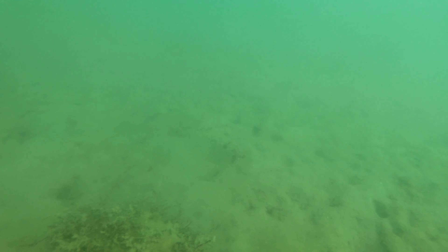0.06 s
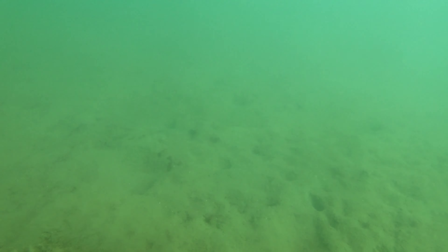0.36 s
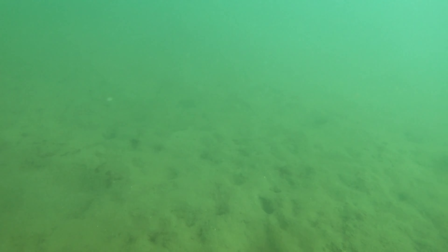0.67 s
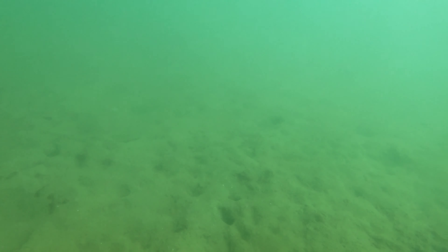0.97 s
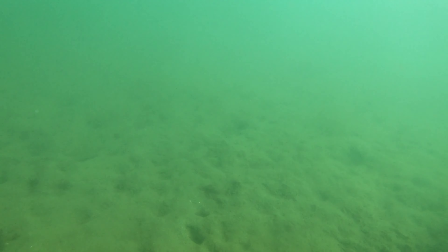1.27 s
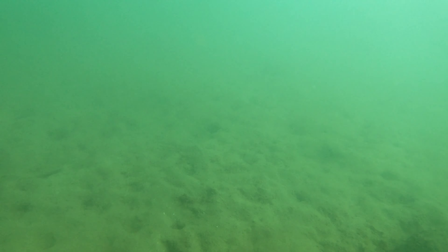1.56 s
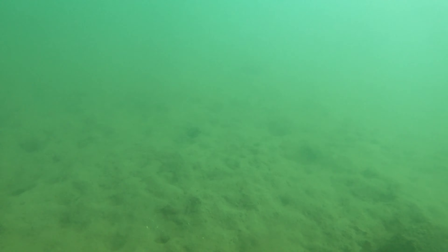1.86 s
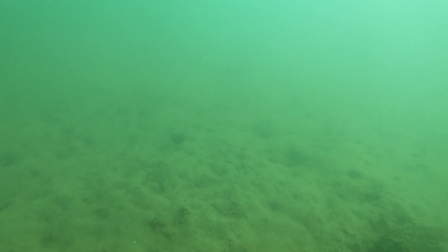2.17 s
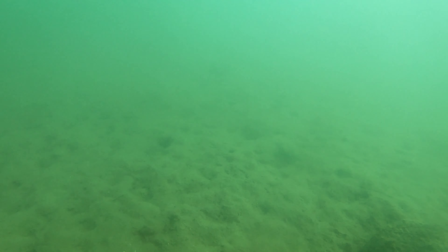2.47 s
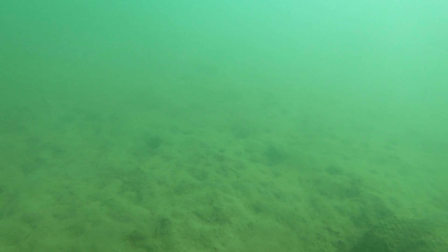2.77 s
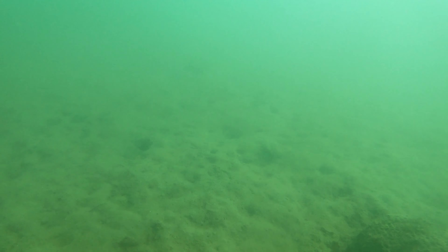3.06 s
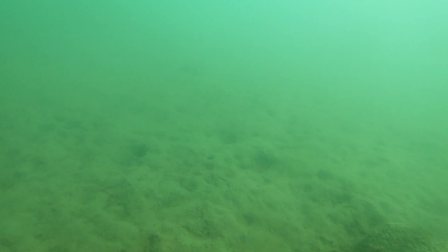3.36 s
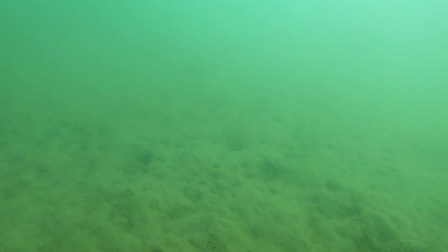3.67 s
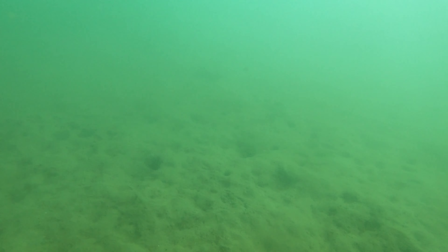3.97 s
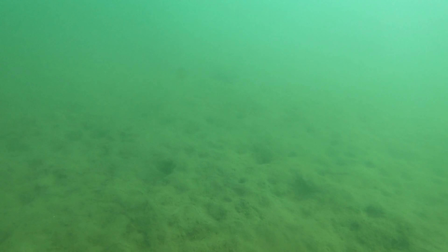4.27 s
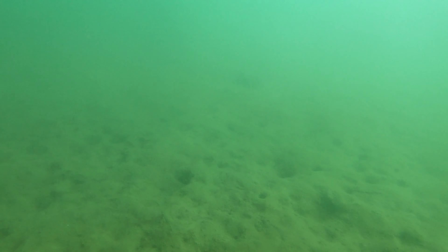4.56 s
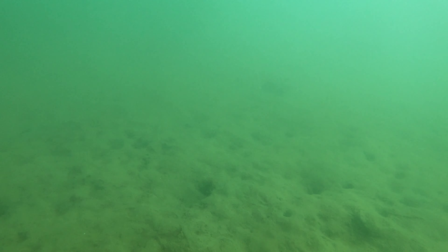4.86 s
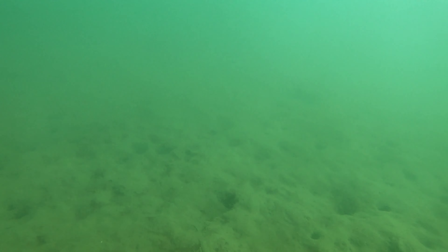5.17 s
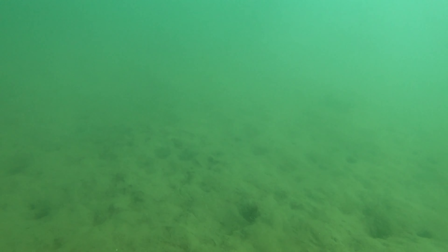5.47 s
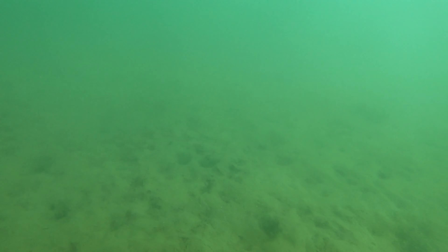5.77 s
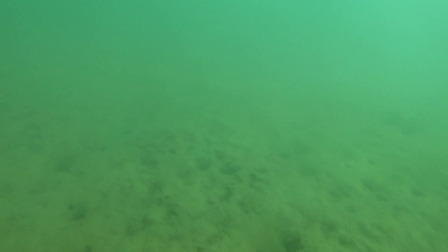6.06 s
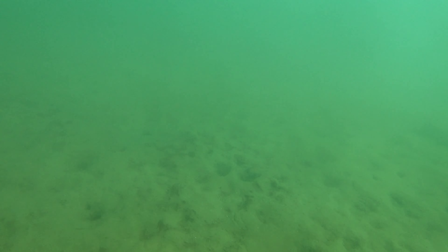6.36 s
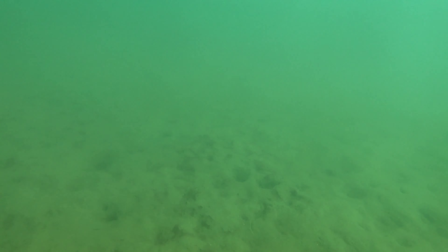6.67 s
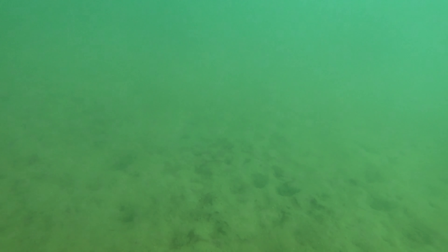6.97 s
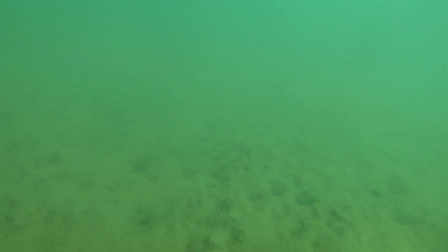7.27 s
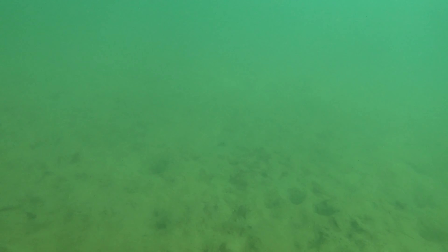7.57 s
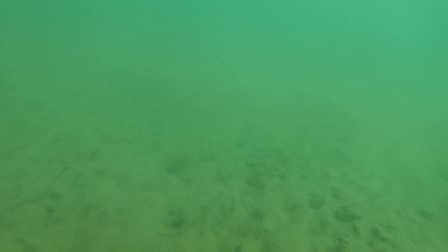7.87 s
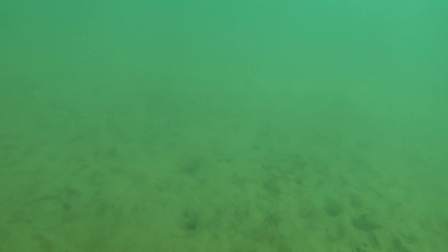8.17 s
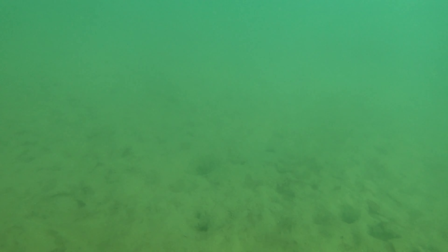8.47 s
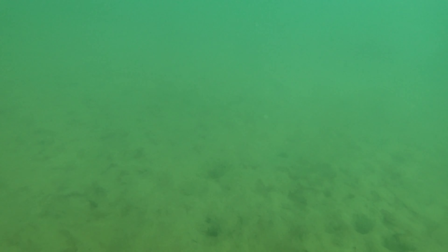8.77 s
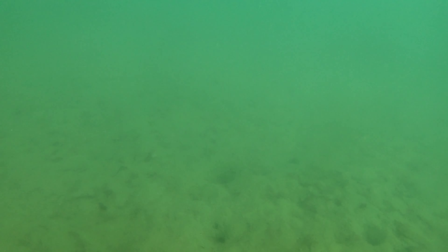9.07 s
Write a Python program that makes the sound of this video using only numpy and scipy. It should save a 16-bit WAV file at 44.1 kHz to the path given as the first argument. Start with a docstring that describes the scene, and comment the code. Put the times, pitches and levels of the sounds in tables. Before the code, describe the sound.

Underwater, sharp irregular snaps and dull pops crackle over the low throb of a distant boat engine.

```python
"""Sharp snaps, probably shrimp, crackle under water in a silty cove: bright cracks and dull pops.
Each is a collapsing bubble that rings the watertight case around the microphone,
then scatters briefly between the seabed and the surface. A far engine throbs about eighteen
times a second, its deep and upper parts swelling and fading on their own.
Behind them are a few bubbles, the frying sound of far snaps and a soft wash of water."""
import sys
import numpy as np
from scipy import signal
from scipy.fft import rfft, irfft, next_fast_len
from scipy.io import wavfile
from scipy.ndimage import uniform_filter1d, map_coordinates

SR = 44100
rng = np.random.default_rng(int(sys.argv[2]) if len(sys.argv) > 2 else 0)


def output_pcm(signal):
    """Save a mono or channel-first signal as 16-bit PCM at the path in sys.argv[1].

    Samples are clipped to [-1, 1] before scaling.
    """
    pcm = np.clip(np.atleast_2d(signal).T, -1, 1) * 32767
    wavfile.write(sys.argv[1], SR, np.round(pcm).astype(np.int16))


N = 401751


def amp(db):
    """Turn decibels into a number to multiply by."""
    return 10 ** (np.asarray(db) / 20)


def unit(x):
    """Scale a signal to an average strength (rms) of 1."""
    return x / np.sqrt(np.mean(x ** 2) + 1e-20)


def curve(rows):
    """Join (time_s, value) points with straight lines, one value per sample."""
    return np.interp(np.arange(N) / SR, *np.transpose(rows))


def wobble(per_second):
    """A smooth curve through so many random values a second."""
    position = np.arange(N) * per_second / SR
    coarse = position[::64]
    values = rng.standard_normal(int(N * per_second / SR) + 4)
    return np.interp(position, coarse, map_coordinates(values, [coarse]))


def filtered(x, response):
    """Multiply each frequency in x by response(hz)."""
    size = next_fast_len(len(x) + 8192)
    return irfft(rfft(x, size) * response(np.fft.rfftfreq(size, 1 / SR)), size)[:len(x)]


def coloured(x, points):
    """Shape the tone of x with (pitch_hz, level_db) points, then scale it to strength 1."""
    pitch_hz, db = np.transpose(points)
    return unit(filtered(x, lambda hz: amp(np.interp(np.log(hz + 1), np.log(pitch_hz), db))))


def add(track, start_s, sound):
    """Mix a sound into a track at start_s."""
    start = max(round(start_s * SR), 0)
    part = sound[:max(len(track) - start, 0)]
    track[start:start + len(part)] += part


# Tone of the water's wash, the case's faint ringing and the hiss: pitch_hz, relative_level_db
WASH_TONE = [(20, -8), (45, -16), (100, -18.5), (280, 4), (400, -2), (520, -4.5), (720, -21.5), (1200, -22),
             (3000, -51.5)]
RINGING_TONE = [(430, -13), (560, -7.5), (620, -0.5), (700, -17), (1400, -43), (1640, -18.5), (1730, -8),
                (1790, -25.5), (2000, -69.5)]
HISS_TONE = [(100, -22), (4000, 8), (9000, -0.5), (15500, -13.5)]

def background(wash_db=-67, ring_db=-69, hiss_db=-95):
    """Water washes past and keeps the case faintly ringing, over two low hums and a hiss."""
    t = np.arange(N) / SR
    wash = coloured(rng.standard_normal(N), WASH_TONE) * amp(wash_db + wobble(2.3) + 3.5 * wobble(24))
    ring = coloured(rng.standard_normal(N), RINGING_TONE) * amp(ring_db)
    hum = amp(-80) * np.sin(2 * np.pi * 64.6 * t) + amp(-84) * np.sin(2 * np.pi * 73.7 * t)
    hiss = coloured(rng.standard_normal(N), HISS_TONE) * amp(hiss_db)
    return wash + ring + np.sqrt(2) * hum + hiss


# The pitches at which the case likes to ring: pitch_hz, width_hz, relative_level_db
CASE_RINGS = [(302, 550, -0.5), (600, 147, 8.5), (824, 180, 3), (970, 110, 1.5), (1200, 90, -2.5),
              (1324, 285, 0.5), (1689, 240, 2), (1940, 270, -11.5), (2514, 570, -11.5), (2885, 650, -10.5),
              (3224, 190, -12.5), (4690, 680, -22.5), (5140, 650, -19.5), (6660, 1600, -26),
              (7800, 1600, -31.5), (9640, 970, -38.5)]

def case_response(hz, boosts_db=np.zeros(len(CASE_RINGS))):
    """The case favours its own pitches; boosts_db says how much harder each one is driven."""
    power = sum(amp(2 * (db + boost)) / (1 + (2 * (hz - pitch) / width) ** 2) ** 2
                for (pitch, width, db), boost in zip(CASE_RINGS, boosts_db))
    # make the ringing come after a hit, never before it (minimum phase)
    cepstrum = irfft(np.log(power) / 2)
    cepstrum[1:] *= 2
    cepstrum[len(cepstrum) // 2:] = 0
    return np.exp(rfft(cepstrum))


def crackle(per_second, fade_s):
    """Random noise ticks of uneven size. Here and below, a fade time is the time to fall 60 dB."""
    sizes = (rng.random(N) < per_second / SR) * amp(rng.uniform(-14, 0, N))
    power_fade = amp(-120 * np.arange(SR // 8) / SR / fade_s)
    power = signal.fftconvolve(sizes ** 2, power_fade)[:N]
    return np.sqrt(np.abs(power)) * rng.standard_normal(N)


# How the far crackle rises and falls: time_s, relative_level_db
FAR_LEVEL = [(0.0, -66), (0.78, -68.5), (0.99, -65), (1.67, -70.5), (2.41, -68), (2.97, -66), (3.14, -69),
             (4.03, -67), (5.53, -68), (5.6, -67), (6.24, -69.5), (6.6, -63.5), (6.88, -68.5), (7.2, -66),
             (8.17, -65.5), (8.3, -63.5), (8.78, -67), (9.11, -67.5)]
# Its tone: pitch_hz, relative_level_db
FAR_TONE = [(200, 0), (500, 1.5), (1000, -3.5), (1750, -4.5), (2200, -4.5), (5000, -8.5), (7500, -0.5),
            (9000, -13)]

def far_snaps(frying_db=-0.5, tick_db=-13, fizz_db=-26):
    """Countless far snaps merge into a frying sound, with dull ticks and bright fizz standing out."""
    frying = coloured(filtered(crackle(per_second=750, fade_s=0.043), case_response), FAR_TONE)
    ticks = coloured(filtered(crackle(per_second=31, fade_s=0.02), case_response), FAR_TONE)
    short_ticks = filtered(crackle(per_second=22, fade_s=0.014), case_response)
    fizz = coloured(short_ticks, [(1200, -40), (2600, -14), (5000, -3), (7500, 3), (10000, 5)])
    return amp(curve(FAR_LEVEL)) * (amp(frying_db) * frying + amp(tick_db) * ticks + amp(fizz_db) * fizz)


# Single bubbles, the largest a low gurgle: start_s, pitch_hz, relative_level_db
BUBBLES = [(1.366, 335, -58), (2.346, 403, -45), (3.848, 544, -44), (3.895, 211, -33), (4.288, 297, -44),
           (4.336, 313, -52), (4.637, 241, -36.5), (4.673, 225, -30), (6.216, 1700, -52.5),
           (6.235, 206, -46), (6.796, 320, -44), (7.695, 493, -41.5), (8.306, 300, -51)]

def bubbles(fade_at_500_hz_s=0.057, rise_cycles=2.8, glide=0.63):
    """Each bubble rings and rises a little in pitch; big, low ones start slower and last longer."""
    track, t = np.zeros(N), np.arange(SR // 6) / SR
    for start_s, hz, db in BUBBLES:
        fade_s = fade_at_500_hz_s * (500 / hz) ** 0.54
        swell = amp(db + 6 - 60 * t / fade_s) * (1 - np.exp(-t * hz / rise_cycles))
        add(track, start_s, swell * np.sin(2 * np.pi * hz * t * (1 + glide * t)))
    return track


# The engine slows a little, then catches up: time_s, lag_beats
ENGINE_LAG = [(0, -0.28), (2.6, -0.23), (3.8, -0.0083), (4.8, 0.06), (8, -0.2783), (9.1, -0.29)]
# Its steady notes: multiple_of_beat, relative_level_db
ENGINE_NOTES = [(7, -18), (8, -10), (9, 0), (10, -5), (11, -11), (12, -2.5), (13, -6), (14, -19)]
# Moments when one note stands out as a smooth drone: peak_s, multiple_of_beat
DRONES = [(0.17, 10), (1.77, 10), (2.32, 12), (2.55, 10), (3.02, 10), (3.92, 12), (4.68, 13), (4.92, 10),
          (5.68, 10), (7.38, 10), (8.6, 9)]
# Tone of its rumble: pitch_hz, relative_level_db
RUMBLE_TONE = [(60, -39.5), (105, -28), (135, -12.5), (160, 3.5), (185, 2), (235, 3), (265, -19),
               (310, -13), (450, -72)]
# How its deep and upper parts swell and fade: time_s, relative_level_db
DEEP_LEVEL = [(0.0, -49), (0.18, -44), (0.45, -58), (0.81, -49), (1.53, -50.5), (1.77, -44.5), (2.19, -57),
              (2.58, -44.5), (2.67, -57), (2.76, -48), (4.77, -54), (4.92, -44), (5.13, -55), (5.31, -56),
              (5.64, -44.5), (5.91, -55.5), (6.54, -46.5), (6.87, -54.5), (7.08, -46), (7.35, -43),
              (7.59, -54), (8.27, -42.5), (8.37, -51.5), (8.46, -41.5), (8.64, -46), (8.95, -50.5),
              (9.02, -40), (9.1, -54)]
UPPER_LEVEL = [(0.0, -55.5), (0.54, -54.5), (1.35, -51.5), (1.44, -44.5), (1.68, -53.5), (1.86, -48),
               (2.01, -54), (2.37, -42.5), (2.49, -55.5), (2.76, -48), (3.75, -52), (3.9, -42.5),
               (4.05, -48), (4.5, -50.5), (4.58, -43.5), (4.8, -53.5), (5.34, -50), (5.91, -57),
               (6.24, -46.5), (6.48, -55), (7.89, -53.0), (8.28, -50.5), (8.37, -56), (9.09, -50.5)]

def engine(beat_hz=17.92, spread=0.36, drone_db=9, drone_s=0.08, rumble_db=-4.5, split_hz=197.1):
    """Each stroke arrives as a low burst: shallow water spreads its pitches in time and roughens it."""
    t = np.arange(N) / SR
    beat_phase = 2 * np.pi * (beat_hz * t - curve(ENGINE_LAG))
    notes = np.zeros(N)
    for multiple, db in ENGINE_NOTES:
        drone = sum(np.exp(-((t - peak_s) / drone_s) ** 2) for peak_s, note in DRONES if note == multiple)
        phase = multiple * beat_phase - spread * (multiple - 10) ** 2 / 2 + 0.42 * wobble(3.3)
        notes += amp(db + drone_db * drone) * np.cos(phase)
    rumble = unit(coloured(rng.standard_normal(N), RUMBLE_TONE) * (1 + 0.5 * np.cos(beat_phase)))
    strokes = (unit(notes) + amp(rumble_db) * rumble) * amp(2.24 * wobble(20))
    deep = filtered(strokes, lambda hz: 1 / (1 + (hz / split_hz) ** 20))
    upper = strokes - deep
    # even out each part over about two strokes, then give it its own swells
    steady = lambda x: x / np.sqrt(np.abs(uniform_filter1d(x * x, size=SR // 9)) + 1e-9)
    throb = amp(curve(DEEP_LEVEL)) * steady(deep) + amp(curve(UPPER_LEVEL) - 1.5) * steady(upper)
    return filtered(throb, lambda hz: 1 / (1 + (hz / 600) ** 4))  # distance leaves no treble


# Clean notes set ringing by some snaps: start_s, pitch_hz, level_db, fade_s
PINGS = [(0.235, 955, -22.5, 0.011), (0.238, 1707, -42, 0.13), (0.8306, 584, -28.5, 0.056),
         (0.832, 970, -32.5, .04), (0.83, 6700, -44, 0.0058), (0.835, 1770, -47, .11),
         (0.878, 3270, -42, 0.012), (1.343, 5140, -45, 0.011), (1.344, 1740, -45, 0.042),
         (1.343, 3140, -43, 0.019), (1.47, 3170, -40, .022), (1.471, 5300, -40.5, 0.0096),
         (2.351, 2730, -49, 0.016), (2.926, 610, -46, 0.072), (3.067, 1684, -45.5, 0.039),
         (3.679, 1736, -57, 0.12), (3.955, 573, -46, .06), (4.283, 1700, -57, 0.13),
         (5.422, 2000, -29, 0.014), (5.421, 3400, -39, 0.009), (5.7336, 1744, -33.5, .022),
         (5.733, 3210, -47, 0.028), (5.923, 557, -47.5, 0.072), (7.05, 7360, -47, 0.0059),
         (7.104, 2950, -40, .008), (7.104, 7340, -46.5, .007), (7.324, 636, -43.5, .05),
         (7.486, 3300, -59.5, .02), (8.083, 3190, -39, .018), (8.083, 5180, -35.5, 0.0098),
         (8.381, 627, -37.5, 0.053), (8.381, 820, -37, 0.022), (8.381, 4770, -42, 0.0076),
         (8.547, 3010, -41, 0.01), (8.845, 446, -42, 0.04)]

def pings(attack_s=0.00033):
    """Struck by a snap, a single pitch rings briefly and dies away."""
    track, t = np.zeros(N), np.arange(SR // 6) / SR
    for start_s, hz, db, fade_s in PINGS:
        loudness = amp(db - 60 * t / fade_s) * (1 - np.exp(-t / attack_s))
        add(track, start_s, loudness * np.sin(2 * np.pi * hz * t))
    return track


# Near snaps, each with an echo whose level is counted from the snap's own:
# start_s, relative_level_db, pitch_hz, brightness_db_per_octave, echo_db
SNAPS = [(0.008, -56.5, 2080, -1.5, -4), (0.154, -63, 3370, 3, -10), (0.235, -39, 1220, 0.5, -3),
         (0.307, -49.5, 544, -11, -25), (0.3517, -59.5, 3300, 4, -5), (0.473, -52.5, 473, -2, -15),
         (0.589, -73, 3120, 5, -16), (0.638, -70, 4400, 4, -12), (0.661, -60.5, 1270, 3, -3.5),
         (0.813, -61, 3430, 7.5, -11), (0.8255, -44.5, 1390, -1, -12), (0.8302, -37.5, 1200, -2, -9),
         (0.8696, -54.5, 1400, 0.5, 1.5), (0.8765, -52.5, 3250, 1.5, -4.5), (1.039, -57, 1290, -5, -1.5),
         (1.068, -53.5, 1430, -5.5, -7), (1.1323, -53, 1600, 3, -8), (1.245, -58, 1510, -3, -16),
         (1.3418, -46, 3800, -0.5, -10), (1.43, -69, 2800, 2, 5.5), (1.4705, -43.5, 2860, 0.5, -6),
         (1.7655, -55.5, 3770, 6, -12.5), (1.951, -48.5, 1290, -2.5, -5), (2.007, -61.5, 1540.0, 2, -5),
         (2.3477, -51.5, 2780, -5.5, -10), (2.407, -54.5, 400, -5.5, -13), (2.565, -54, 1490, -2, -5.5),
         (2.655, -62.5, 1430, 0, -10), (2.727, -64, 1000, -1, -8), (2.8256, -62.5, 1460, 7.5, -4),
         (2.865, -52.5, 616, 1, -15), (2.9237, -48, 1490, 1, -4), (3.0126, -50.5, 1310, -5.5, -2.5),
         (3.0666, -51, 1790, 0, -3.5), (3.226, -64, 1500, 3.5, -16), (3.3086, -57.5, 1330, -2, -13),
         (3.477, -78.5, 3000, 8, -6), (3.5318, -49, 1160, 2, -6.5), (3.573, -66, 2900, 0, -8),
         (3.5813, -57.5, 4100, 1, -11), (3.6379, -53.5, 1310, -1, 1), (3.678, -65, 1700, -2, 3),
         (3.7286, -55.5, 398, -3, -13), (3.752, -75.5, 6840, 5, -21), (3.9, -62.5, 5200, 4.5, -8),
         (3.9542, -48.5, 1260, 0, -7.5), (4.082, -72.5, 2900, 2, -16), (4.117, -49.5, 1570, -3.5, -8.5),
         (4.164, -71.5, 2940, 10, -6), (4.218, -69, 2960, 3.5, 0), (4.233, -62.5, 1000, -4, -12),
         (4.2815, -60.5, 1820, -3, -0.5), (4.411, -63, 1890, 6, -4), (4.9851, -54.5, 513, -5.5, -1),
         (5.0773, -54.5, 1120, -6, -5.5), (5.087, -70, 6500, 0.5, -6), (5.105, -65.5, 1300, 0.5, 7.5),
         (5.359, -72, 5140, 3.5, -11), (5.4225, -45.5, 2500, 3.5, -11.5), (5.4896, -60, 2200, 4, -3.5),
         (5.5602, -52, 664, -8.5, -15), (5.6316, -63.5, 2950, -1.5, -5), (5.7313, -50.5, 1850, 6, -8.5),
         (5.772, -50, 2010, 1.0, -12.5), (5.922, -50, 1280, -3, -11.5), (6.287, -86, 6500, 17, -7),
         (6.358, -77, 2900, 8, -12), (6.3924, -56, 3400.0, -1, -9.5), (6.472, -65.5, 3000, -0.5, 2.5),
         (6.5514, -54.5, 1360, -1.5, -9), (6.623, -51.5, 1240, -3.5, -8), (6.673, -55.5, 3610.0, 0.5, -7),
         (6.699, -69, 7000, 3.5, -13), (6.834, -56, 7000, -5.5, 0), (6.849, -76, 7000, 8, -7),
         (6.9364, -49.5, 1290, -2.5, -6.5), (7.014, -79, 6700, 9, -7), (7.0487, -49, 3670, 1, -6.5),
         (7.1026, -56, 3040, 6.5, -18), (7.1746, -60.5, 6200, 0, -9), (7.262, -63, 5800, 3.5, -8),
         (7.3225, -47, 1560, -1, -13), (7.3737, -62.5, 1340, -3.5, 2), (7.423, -57, 1000, -4, -20),
         (7.485, -74, 3010.0, 5, -11), (7.505, -64, 5300, 1, -9), (7.567, -60.5, 1410, -8, -10),
         (7.632, -58, 2670, -3.5, -6.5), (7.6988, -53.5, 447, 1.5, -10), (7.777, -52.5, 2720, -1.5, -4),
         (7.827, -49, 980, -4, -5.5), (7.8629, -52, 1250, 1, -1), (7.948, -84, 6000, 1, -9),
         (8.0809, -47.5, 1900, 5, -10), (8.1458, -60, 6700, -1, -4), (8.1675, -54.5, 3200.0, 0.5, -7.5),
         (8.196, -52.5, 2980, 1.5, -6.5), (8.307, -54, 990, -16, -15), (8.3343, -56.5, 405, 0.5, -9),
         (8.3786, -42, 1420, -2.5, -7.5), (8.4091, -55.5, 4740, 3, -9), (8.4723, -61.5, 2070, 3, -1),
         (8.547, -53, 3570, 4.5, -13.5), (8.594, -56, 1100, -8, -5), (8.601, -84, 7000, 11, -9),
         (8.752, -53, 3340, -3.5, -6), (8.765, -56.5, 1060.0, 1.5, 0), (8.8429, -47, 1090, -3, -21),
         (8.903, -71, 2900, -2, -7), (8.9432, -57.5, 1200.0, 0, -14), (9.014, -60, 2450, -6.5, -12),
         (9.067, -55, 1230, -1.5, -6)]

def snap_clicks(offset_db=-31, fade_s=0.006):
    """A loud, bright snap starts with a thin, high click that passes straight through the case."""
    track, t = np.zeros(N), np.arange(SR // 100) / SR
    for start_s, db, _, brightness, _ in SNAPS:
        loudness = amp(db + offset_db + 2 * brightness - 60 * t / fade_s)
        add(track, start_s, loudness * rng.standard_normal(len(t)))
    return signal.sosfilt(signal.butter(2, (6000, 12000), "band", fs=SR, output="sos"), track)


# Pitch ranges of a snap that each die away at their own speed: low_hz, high_hz
SNAP_BANDS = [(320, 1075), (1100, 2200), (1950, 3800), (3800, 12000)]

def near_snaps(attack_s=0.0005, crack_fade_s=0.0045, echo_fade_s=0.28, near_db=-46,
               pitch_boost_db=8.5, pitch_width_octaves=0.51, treble_hz=3800, treble_loss_db_per_s=70):
    """A collapsing bubble's crack rings the case, then scatters between seabed and surface."""
    size = SR // 4
    t, hz = np.arange(size) / SR, np.fft.rfftfreq(size, 1 / SR)
    octave = np.log2(np.clip(hz, 350, 7500))
    onset = 1 - np.exp(-(t / attack_s) ** 2)
    filters = [signal.butter(3, edges, "band", fs=SR, output="sos") for edges in SNAP_BANDS]
    bands = np.array([signal.sosfreqz(sos, hz, fs=SR)[1] for sos in filters])
    # each band holds for a moment, then fades; higher bands end sooner
    high_hz = np.array(SNAP_BANDS)[:, 1:]
    hold_s = 0.005 * np.sqrt(1000 / high_hz)
    ring_fade_s = 0.044 * (1000 / high_hz) ** 0.039
    ring_fades = amp(-60 * np.maximum(t - hold_s, 0) / ring_fade_s)
    echo_shape = amp(-60 * t / echo_fade_s) * (1 - np.exp(-t / 0.0036))
    treble_fade = amp(-treble_loss_db_per_s * t)
    track = np.zeros(N)
    for start_s, db, pitch_hz, brightness, echo_db in SNAPS:
        pitch_bump = np.exp(-((octave - np.log2(pitch_hz)) / pitch_width_octaves) ** 2 / 2)
        snap_tone = amp(pitch_boost_db * pitch_bump + brightness * (octave - octave.mean()))
        # a snap from one direction drives the case's pitches unevenly
        body = bands * case_response(hz, rng.normal(0, 2, len(CASE_RINGS))) * snap_tone
        # loud, high snaps arrive straight, as a hard crack; low ones by many paths, as a rough cluster
        crack_db = 14 + (db - near_db) + 8 * np.log2(pitch_hz / 2000)
        crack = amp(crack_db - 60 * t / crack_fade_s)
        bursts = rng.standard_normal(ring_fades.shape) * onset * (crack + ring_fades)
        rings = irfft(rfft(bursts) * body, size)
        band_shares = np.linalg.norm(body, axis=1, keepdims=True)
        ring = (rings / rings.std(axis=1, keepdims=True) * band_shares).sum(axis=0)
        ring /= ring[t < 0.014].std()  # the first 14 ms set the level
        # the scattered sound arrives in uneven clumps, and its treble dies sooner
        echo_tone = np.linalg.norm(body, axis=0) * amp(1.24 * octave)
        clumps = amp(1.5 * unit(uniform_filter1d(rng.standard_normal(size), size=SR // 300)))
        scattered = unit(irfft(rfft(clumps * rng.standard_normal(size)) * echo_tone, size))
        dull = irfft(rfft(scattered) / (1 + (hz / treble_hz) ** 8), size)
        echo = echo_shape * (dull + treble_fade * (scattered - dull))
        add(track, start_s, amp(db - 0.6) * (ring + amp(echo_db) * echo))
    return track


def scene():
    """Everything reaches one microphone inside the case."""
    return (engine() + near_snaps() + snap_clicks() + pings() + far_snaps()
            + bubbles() + background())[None]


def record(dry):
    """The very highest treble is cut away."""
    return np.array([filtered(x, lambda hz: hz < 15800) for x in dry])


dry = scene()
out = record(dry)
output_pcm(out)
```